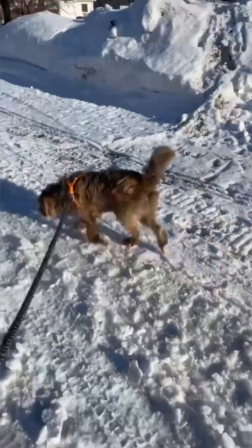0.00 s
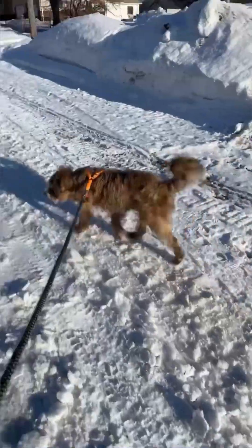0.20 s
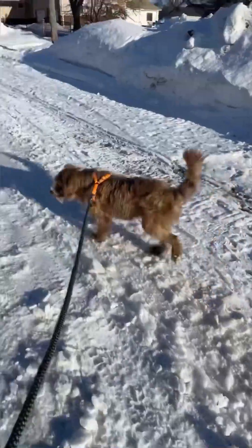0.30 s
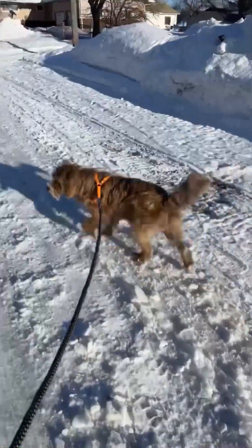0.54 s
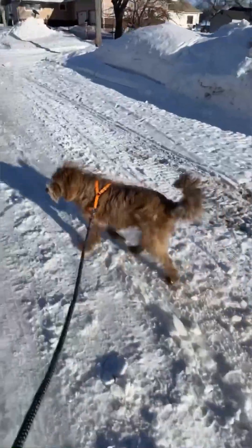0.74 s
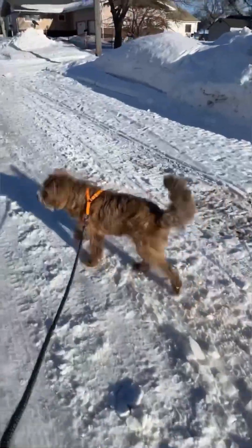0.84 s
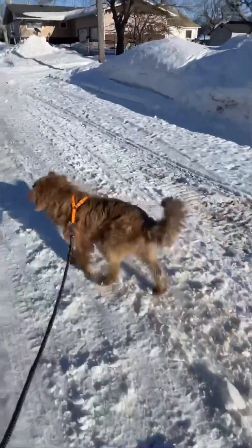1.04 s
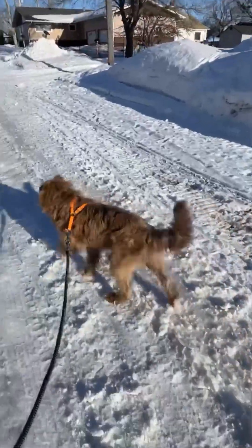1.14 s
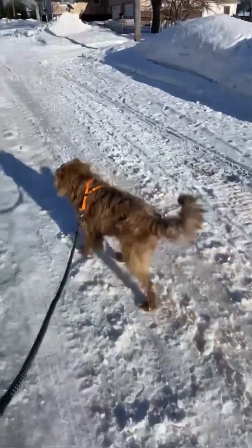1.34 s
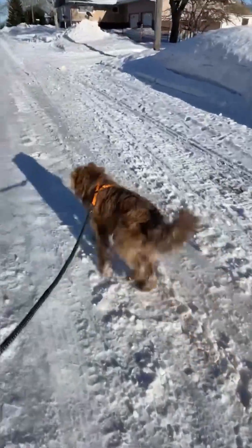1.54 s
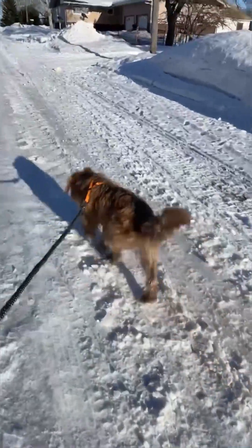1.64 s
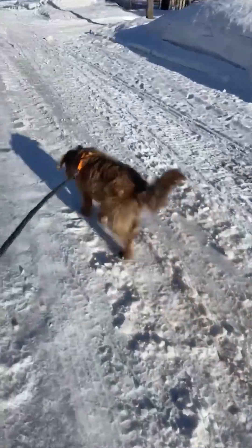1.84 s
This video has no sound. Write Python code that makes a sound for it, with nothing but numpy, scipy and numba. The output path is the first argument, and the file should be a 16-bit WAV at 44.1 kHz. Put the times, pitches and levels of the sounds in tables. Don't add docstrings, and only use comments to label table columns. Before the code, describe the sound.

Boots crunching on crusty snow, one loud cracking step followed by softer crisp ones, over faint hum

```python
import sys
import numpy as np
from scipy import signal
from scipy.fft import rfft, irfft
from scipy.io import wavfile
from scipy.ndimage import map_coordinates
from numba import njit

SR = 44100
rng = np.random.default_rng(int(sys.argv[2]) if len(sys.argv) > 2 else 0)


def elevation(decibels):
    levels = np.asarray(decibels, float)
    return 10 ** (levels / 20)


def unload_audio(sound):
    columns = np.transpose(np.atleast_2d(sound))
    steps = np.round(np.clip(columns, -1, 1) * 32767)
    wavfile.write(sys.argv[1], SR, steps.astype(np.int16))


N = 81585

# t/s, level/dB, brightness/dB
RUSTLE_CURVE = [(0, -35.5, 3), (0.089, -43.5, 2), (0.268, -38, 2.5), (.4, -40, -1), (0.581, -38.5, 3),
                (0.631, -46.5, -0.5), (.75, -43.5, 2.5), (.84, -39, -2.5), (.99, -38.5, -12),
                (1.111, -41.5, 4), (1.3, -42, 1), (1.369, -46, 0.5), (1.53, -38, -5), (1.74, -38.5, -3),
                (1.8, -47, -3)]
# f/Hz, density/dB
RUSTLE_SPECTRUM = [(150, -22), (300, -7.5), (1200, -9.5), (3500, -16.5), (5200, -14.5), (8500, -14.5),
                   (9500, -19), (15500, -11)]
# f/Hz, density/dB
HUM_SPECTRUM = [(15, -19.5), (65, 2.5), (140, -5), (300, -4.5), (450, -39.5)]
# t/s, peak/dB, f/Hz
CRUST_SNAPS = [(0.0205, -18, 4880), (0.1466, -34.5, 4110), (0.2393, -18, 3000), (0.2417, -30.5, 1900),
               (0.4385, -26, 2900), (0.4412, -25, 2700), (0.456, -21.5, 3200), (0.4645, -23.5, 1004),
               (0.5165, -28, 2300), (0.53, -30.5, 800), (0.541, -31.5, 2510), (0.9175, -22, 823),
               (0.9263, -19.5, 846), (0.197, -35.5, 1500), (0.204, -31, 1500), (0.214, -31.5, 1800),
               (0.3375, -29, 1900), (0.391, -31, 3010), (0.4095, -26, 5000), (1.0595, -27.5, 1890),
               (1.0775, -28.5, 1294), (1.0895, -25, 2200), (1.1065, -27, 1890), (0.2585, -30, 1100),
               (0.667, -30, 3980), (0.7112, -28, 4230), (0.757, -38, 2625), (0.7945, -31.5, 1900),
               (0.8092, -27.5, 3300), (0.829, -37, 1800), (0.866, -40, 2520), (0.8765, -34.5, 1110),
               (0.8808, -21.5, 4470), (0.9135, -17.5, 4270), (0.969, -32, 2500), (0.984, -27, 1275),
               (1.0085, -24, 5120), (1.0195, -26.5, 1190), (1.148, -31.5, 894), (1.3549, -30.5, 5460),
               (1.4297, -28.5, 2700), (1.448, -23.5, 6560), (1.4645, -30, 1180), (1.4655, -33.5, 4500),
               (1.4915, -29, 5000), (1.515, -29, 4800), (1.5255, -32.5, 1400), (1.5655, -18.5, 3520),
               (1.5702, -14, 3680), (1.631, -25, 4000), (1.6489, -13.5, 5670), (1.6757, -19, 3950),
               (1.6853, -25, 4200), (1.711, -27, 3800), (1.723, -25.5, 4030), (1.7545, -29, 4450),
               (1.769, -35, 3000)]
# t/s, peak/dB, centre f/Hz, length/s
ICE_TICKS = [(0.0262, -26, 7100, 0.00836), (0.1958, -20.5, 8200, 0.00088), (0.2346, -21, 8190, 0.0065),
             (0.2502, -28.5, 7600, 0.0052), (0.276, -27.5, 8440, 0.0029), (0.432, -38.5, 6330, 0.0023),
             (0.4369, -23.5, 6900, 0.00158), (0.4607, -20, 7360, 0.0127), (0.4728, -23, 9670, 0.0044),
             (0.4934, -24.5, 8580, 0.0085), (0.499, -31.5, 8550, 0.0015), (0.529, -27, 10070, 0.0046),
             (0.5326, -21.5, 6970, 0.0011), (0.542, -28.5, 7500, 0.0031), (0.5602, -23, 8680, 0.001),
             (0.6666, -31, 8740, 0.0017), (0.825, -24, 9400, 0.0022), (0.8328, -24, 7200, 0.00196),
             (0.832, -31.5, 8700, 0.0077), (0.7187, -32.5, 6880, 0.0047), (0.8833, -38, 5480, 0.0045),
             (0.9142, -16, 6830, 0.00187), (0.9582, -29.5, 7480, 0.00335), (1.009, -36.5, 5580, 0.00051),
             (1.3545, -17.5, 7310, 0.0015), (1.399, -23, 8230, 0.00166), (1.566, -51.5, 5900, 0.002),
             (1.5828, -41.5, 6030, 0.00133), (1.585, -41.5, 6720, 0.00126), (1.649, -23, 5800, 0.0007),
             (1.676, -29.5, 6050, 0.0007), (1.757, -26.5, 6950, 0.00071)]
# t/s, peak/dB, f/Hz
HAND_BUMPS = [(.73, -42, 46.7), (0.72, -35, 105), (0.73, -33, 57), (1.582, -34, 64), (0.18, -43, 66),
              (.07, -40.5, 88.7), (.57, -42, 68.6), (1.18, -42, 47)]
# t/s, peak/dB, f/Hz
LUMP_CRACKS = [(0.0962, -29.5, 1635), (0.2397, -2.5, 1761), (0.248, -23, 2000), (0.2521, -24, 1460),
               (0.3044, -16, 1508), (0.33, -27, 1930), (0.347, -27, 2030), (0.365, -25.5, 2520),
               (0.3814, -25, 2440), (0.4276, -20, 2007), (0.436, -9, 2900), (0.4391, -32.5, 2500),
               (0.443, -8, 2940), (0.4493, -13, 2420), (0.4561, -8, 1726), (0.4603, -3.5, 1316),
               (0.4635, -5.5, 1170), (0.4699, -0.5, 1165), (0.473, -4, 1318), (0.4761, -4, 1463),
               (0.4952, -20.5, 1310), (0.5026, -23, 1630), (0.508, -23.5, 1280), (0.53, -33.5, 1270),
               (0.5327, -11, 2180), (0.553, -21.5, 862),
               (0.7112, -25, 1980), (0.7655, -30, 1420), (0.7801, -28.5, 887), (0.8091, -25.5, 2026),
                   (0.8822, -23.5, 2350), (0.8914, -21, 1510), (0.9167, -11.5, 1596), (0.9254, -6.5, 1621),
                   (0.948, -15.5, 1009), (1.0089, -13, 2520), (1.0099, -17.5, 763), (1.0461, -16.5, 2440),
                   (1.0638, -15, 1446), (1.0672, -14, 1570), (1.0705, -35, 1210), (1.0724, -13, 1417),
                   (1.0823, -15.5, 1850), (1.1, -17.5, 1324),
               (1.4403, -27.5, 1940), (1.5676, -28, 1670), (1.569, -40, 2410), (1.5723, -24.5, 1800),
                   (1.5881, -15.5, 3100), (1.6156, -22.5, 1550), (1.6233, -23.5, 1430), (1.6493, -15, 1304),
                   (1.6734, -19, 1050), (1.6768, -20, 1097), (1.6863, -23, 1285), (1.7555, -27.5, 1357)]
# hardest at t/s, level/dB, rise/s, release/s, grain f/Hz
BOOT_PRESSES = [(0.2326, -41, 0.0395, 0.0174, 1660), (0.4446, -28, 0.02644, 0.0104, 2290),
                (0.5094, -35.5, 0.0464, 0.0057, 1600), (0.53, -28.5, 0.00376, 0.0108, 1550),
                (1.41, -54, 0.05, 0.082, 365), (1.047, -34.5, 0.0154, 0.0117, 2450),
                (1.0736, -34.5, 0.0224, 0.0502, 1596), (1.564, -33, 0.0281, 0.0272, 2770),
                (1.615, -40, 0.045, 0.0525, 1460), (1.677, -35.5, 0.00782, 0.0103, 1280),
                (1.751, -45.5, 0.06, 0.0335, 2005), (1.491, -53, 0.0487, 0.085, 3630),
                (1.1318, -49, 0.0453, 0.0995, 5270)]
# t/s, peak/dB, f/Hz
WEIGHT_THUDS = [(0.2434, -53.5, 356), (0.4428, -35, 312), (0.4737, -15.5, 314), (0.5326, -27.5, 293),
                (0.557, -26, 317), (0.8465, -32.5, 368), (0.853, -29, 315), (0.863, -34, 300),
                (1.365, -35, 420), (1.385, -39, 258), (1.447, -34.5, 236), (0.378, -36, 250),
                (0.693, -37.5, 455), (0.9273, -29, 309.4), (0.9548, -30.5, 315), (1.091, -33.5, 276),
                (1.3005, -31, 292), (1.5686, -28, 406), (1.6801, -41.5, 285)]


def level(x, db):
    return x * elevation(db) / np.sqrt(np.mean(x ** 2))


def white():
    return rng.standard_normal(N)


def colour(x, points):
    hz, db = np.array(points, float).T
    f_hz = np.maximum(np.fft.rfftfreq(N, 1 / SR), 1)
    gain_db = np.interp(np.log(f_hz), np.log(hz), db)
    return irfft(rfft(x) * elevation(gain_db), N)


def band(x, hz, width):
    edges_hz = np.clip([hz / (1 + width), hz * (1 + width)], 20, SR * .45)
    return signal.sosfilt(signal.butter(2, edges_hz, "band", fs=SR, output="sos"), x)


def walk(rate_hz):
    knots = rng.standard_normal(1200)
    w = map_coordinates(knots, [np.arange(N) * rate_hz / SR], order=3, mode="mirror")
    return w / w.std()


@njit
def grains(n, sr, at_s, size, hz, cycles, phase, rise, sag):
    y = np.zeros(n)
    for k in range(len(at_s)):
        period = sr / hz[k]
        centre = at_s[k] * sr
        first = max(int(centre - 3 * rise * period), 0)
        last = min(int(centre + 5 * cycles[k] * period), n)
        for i in range(first, last):
            u = (i - centre) / period
            if u < 0:
                envelope = np.exp(-(u / rise) ** 2 / 2)
            else:
                envelope = 1 / np.cosh(u / cycles[k] * 1.3)
            turns = u / (1 + sag * max(u + 1.5, 0.)) * (1 + 1.5 * sag)
            y[i] += size[k] * envelope * np.sin(2 * np.pi * turns + phase[k])
    return y


def wavelets(rows, cycles, sag, loose=1, rise=0.372):
    at_s, db, hz = np.array(rows, float).T.copy()
    phase = 2 * np.pi * (loose * (rng.random(len(at_s)) - .5) - 1 / 4)
    return grains(N, 1. * SR, at_s, elevation(db), hz, cycles + 0 * at_s, phase, 1. * rise, 1. * sag)


def scatter(per_s, db, hz, cycles, count):
    spread_oct, scatter_db = 0.888, 5.5
    gap, loud, pitch, turn = rng.random((count, 4)).T
    at_s = np.cumsum(-np.log(gap + 1e-9)) / per_s
    i = np.minimum((at_s * SR).astype(int), N - 1)
    size = elevation(db[i] - scatter_db * np.log(loud + 0.0612))
    offset_oct = spread_oct * np.log(pitch / (1 - pitch) + 1e-9) / 2
    tone_hz = np.clip(hz[i] * 2 ** offset_oct, 150, 12000)
    return grains(N, 1. * SR, at_s, size, tone_hz, np.full(count, 1. * cycles), 2 * np.pi * turn, 0.645, 0.25)


def rustle(t):
    grit_per_s, grit_db, grit_hz = 200, -9, 1740
    fleck_per_s, fleck_db, fleck_hz = 170, -8, 4500
    dip_hz, dip_share, split_hz = 14200, .97, 3000
    at_s, db, bright_db = np.array(RUSTLE_CURVE, float).T
    db, bright_db = np.interp(t, at_s, db), np.interp(t, at_s, bright_db)
    noise = level(colour(white(), RUSTLE_SPECTRUM), 0)
    noise = noise - dip_share * signal.filtfilt(*signal.iirpeak(dip_hz, 10, SR), noise)
    low = signal.sosfilt(signal.butter(2, split_hz, fs=SR, output="sos"), noise)
    swell_db = 2.04 * walk(150)
    hiss = low * elevation(swell_db + 2 * walk(31.946))
    hiss = hiss + (noise - low) * elevation(swell_db + bright_db + walk(30.376))
    grit = scatter(grit_per_s, db + grit_db, np.full(N, 1. * grit_hz), 1.0, count=700)
    fleck_level_db = db + fleck_db + bright_db / 2
    flecks = scatter(fleck_per_s, fleck_level_db, np.full(N, 1. * fleck_hz), 0.86, count=400)
    return hiss * elevation(db) + grit + flecks


def hum():
    return level(colour(white(), HUM_SPECTRUM), -50.5) * elevation(0.5 * walk(7.46))


def snaps():
    return wavelets(CRUST_SNAPS, cycles=0.786, sag=0.173, loose=.25, rise=0.464)


def ticks(t):
    rise_s, width, top_hz, top_width, top_db = .0002, 0.58, 12530, 0.265, -4.5
    out, noise = np.zeros(N), white()
    for at_s, db, hz, length_s in ICE_TICKS:
        span = slice(max(int((at_s - .02) * SR), 0), int((at_s + .04) * SR))
        u_s = t[span] - at_s + length_s / 2
        shape = np.exp(-np.where(u_s < 0, -u_s / rise_s, (u_s / length_s) ** 2))
        core = level(band(band(noise[span], hz, width), hz, width), 0)
        top = level(band(noise[span], top_hz, top_width), top_db)
        out[span] += elevation(db - 5) * shape * (core + top)
    return out


def bumps():
    return wavelets(HAND_BUMPS, cycles=0.69, sag=.13)


def cracks():
    edge_ratio, edge_s, edge_db = 1.97, -.0002, -10.5
    belly_ratio, belly_s, belly_db = 0.3526, .0005, -21.5
    tail_s, tail_db, tail_hz, tail_width = 0.00191, -11, 1455, 0.708
    rows = np.array(LUMP_CRACKS, float)
    pops = wavelets(rows, cycles=0.926, sag=0.1655, loose=.25, rise=0.466)
    edge = wavelets(rows * [1, 1, edge_ratio] + [edge_s, edge_db, 0], cycles=1.0, sag=.13)
    belly = wavelets(rows * [1, 1, belly_ratio] + [belly_s, belly_db, 0], cycles=0.934, sag=.13)
    fade = np.exp(-1 / (tail_s * SR))
    tail = np.sqrt(signal.lfilter([1 - fade], [1, -fade], pops ** 2))
    crumble = tail * level(band(white(), tail_hz, tail_width), tail_db)
    return pops + edge + belly + crumble


def crush(t):
    grains_per_s, grain_cycles = 2500, 0.885
    hiss_db, flicker_db, hiss_ref_hz, body_db = -4.5, 3.2, 2200, -12
    push, weighted_hz = np.full(N, 1e-6), np.full(N, 1e-3)
    for at_s, db, rise_s, release_s, hz in BOOT_PRESSES:
        fall = np.where(t < at_s, ((at_s - t) / rise_s) ** 2, ((t - at_s) / release_s) ** 2)
        press = elevation(db) * np.exp(-fall)
        push = push + press
        weighted_hz = weighted_hz + press * hz
    tone_hz = weighted_hz / push
    dense = scatter(grains_per_s, 20 * np.log10(push) - 6, tone_hz, grain_cycles, count=6000)
    hiss = colour(white(), [(1500, -0.5), (4000, 6.5), (9000, -4.0), (16000, -12.0)])
    hiss = level(hiss, hiss_db) * elevation(flicker_db * walk(400)) * tone_hz / hiss_ref_hz
    body = level(band(white(), 287.3, 1.0), body_db)
    return dense + push * (hiss + body)


def thuds():
    return wavelets(WEIGHT_THUDS, cycles=0.537, sag=.13)


def scene():
    t = np.arange(N) / SR
    background = rustle(t) + hum()
    breaking = snaps() + ticks(t) + cracks() + crush(t)
    return (background + breaking + bumps() + thuds())[None]


def low_pass(x):
    return signal.sosfilt(signal.butter(12, 17140, fs=SR, output="sos"), x)


def record(dry):
    port_hz, port_q, port_db, top_hz = 7900, 5.0, -4, 15750
    dry = np.tanh(dry / 1.1) * 1.1
    x = dry + elevation(port_db) * signal.lfilter(*signal.iirpeak(port_hz, port_q, SR), dry)
    x = signal.sosfilt(signal.ellip(8, .2, 50, top_hz, fs=SR, output="sos"), x)
    return low_pass(x)


dry = scene()
out = record(dry)
unload_audio(out)
```